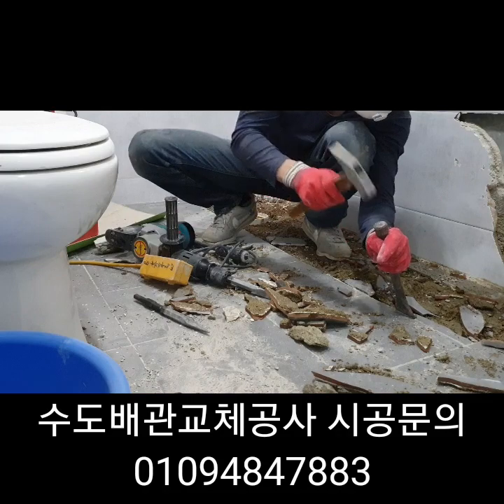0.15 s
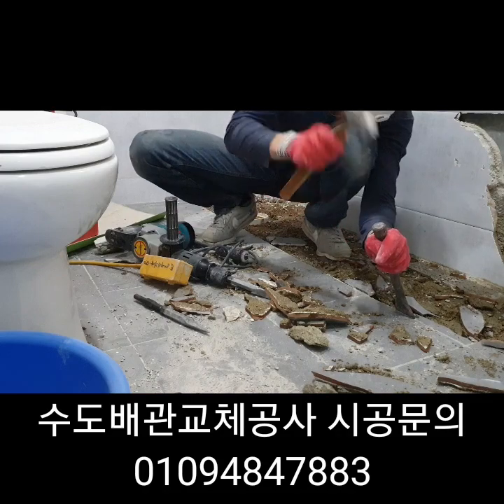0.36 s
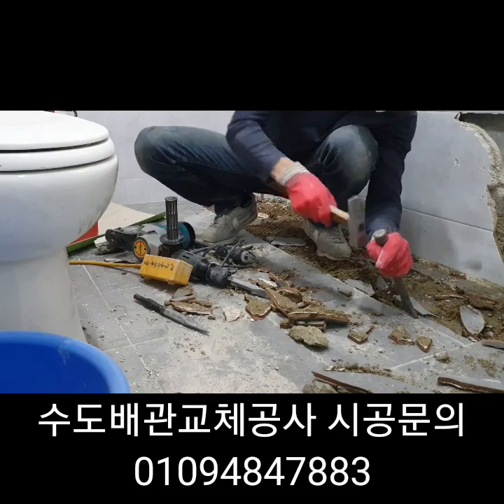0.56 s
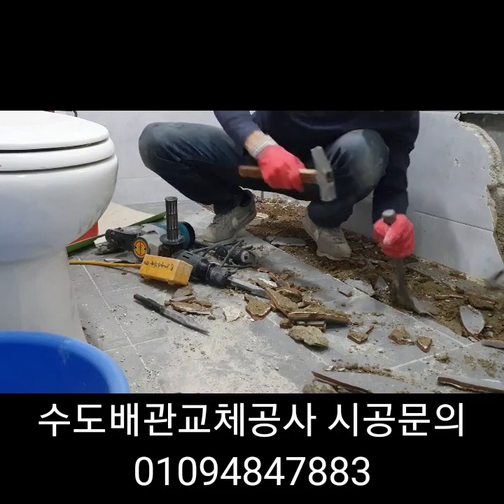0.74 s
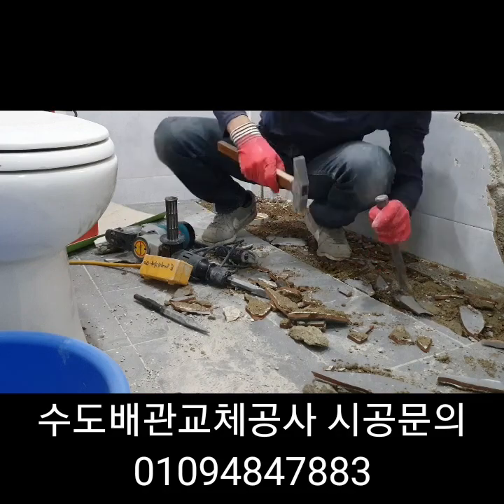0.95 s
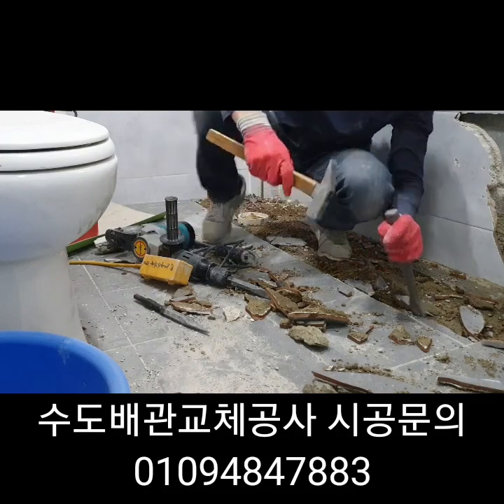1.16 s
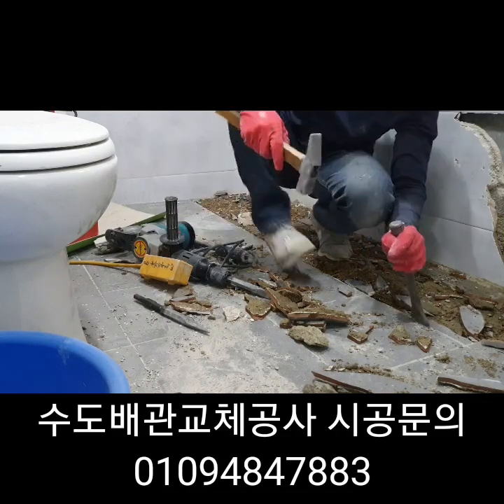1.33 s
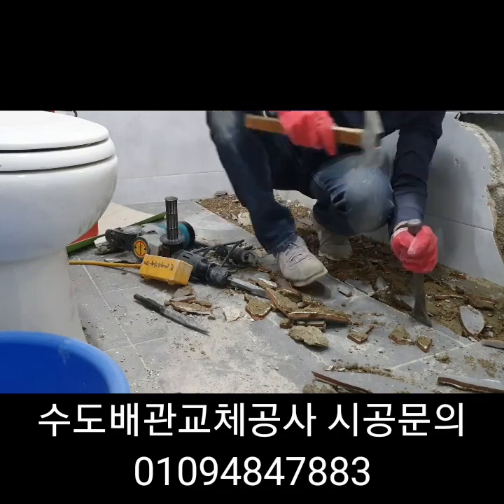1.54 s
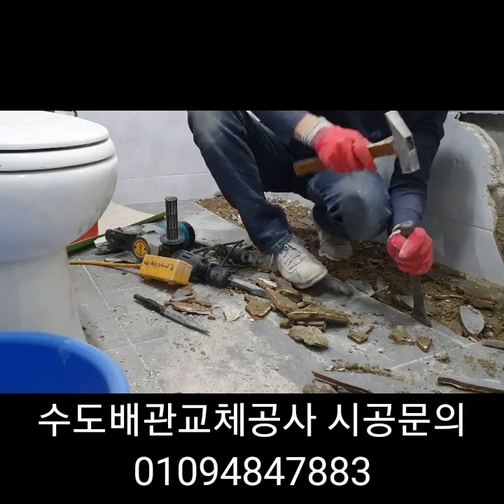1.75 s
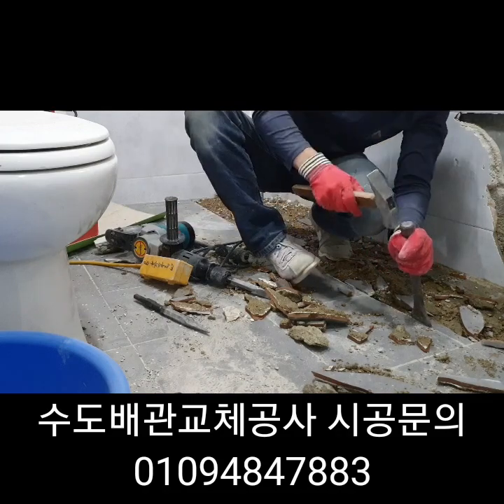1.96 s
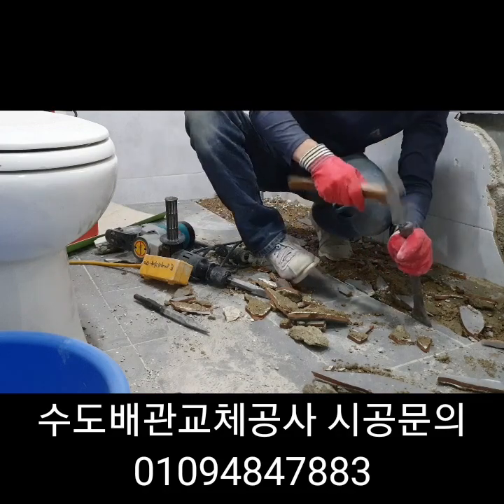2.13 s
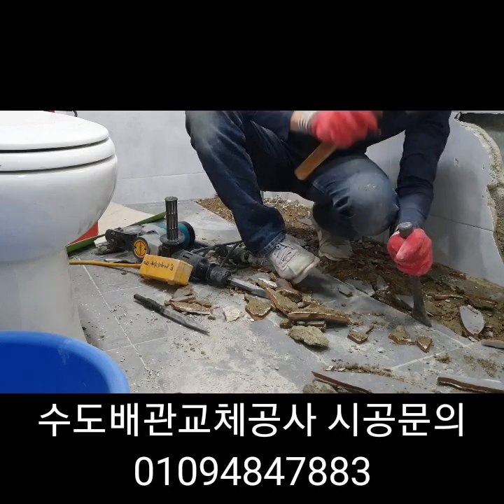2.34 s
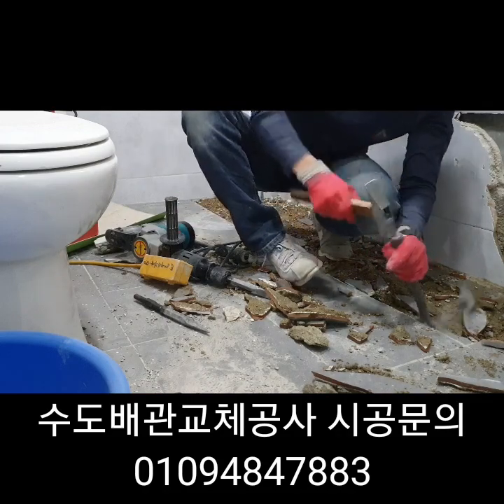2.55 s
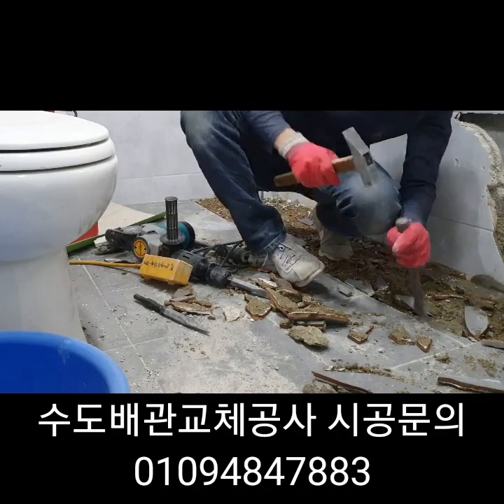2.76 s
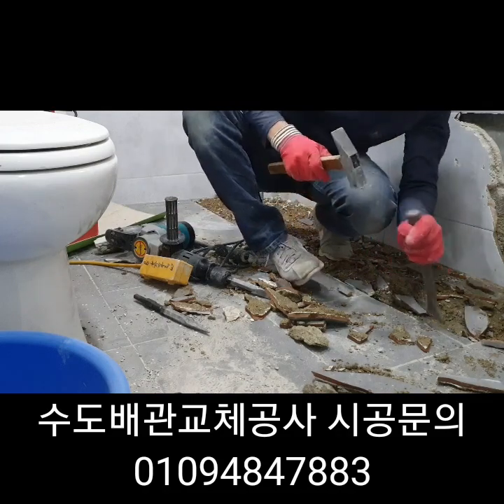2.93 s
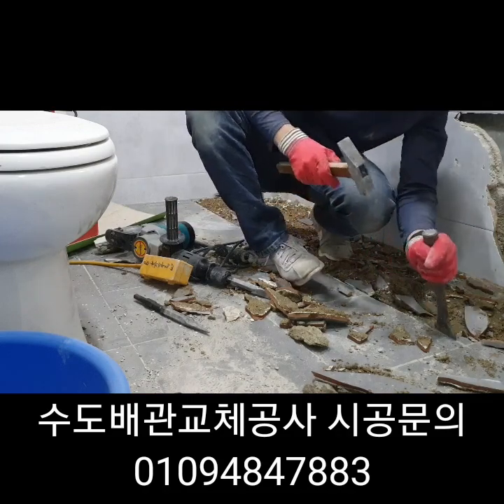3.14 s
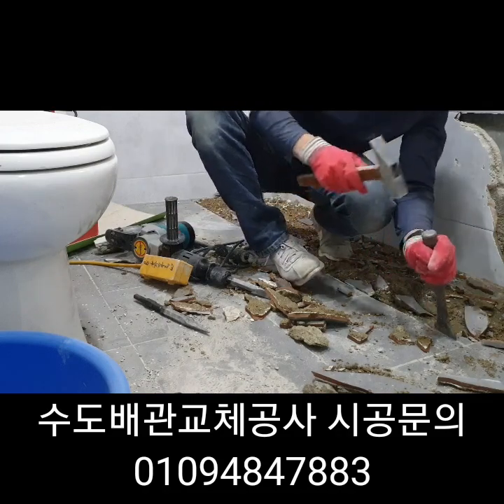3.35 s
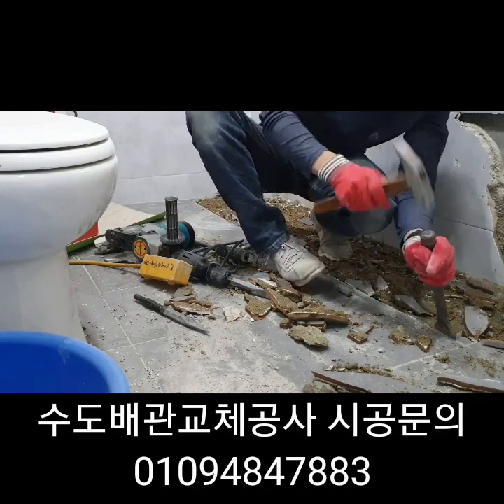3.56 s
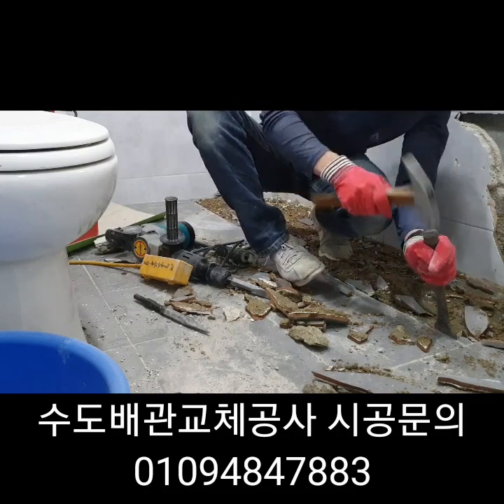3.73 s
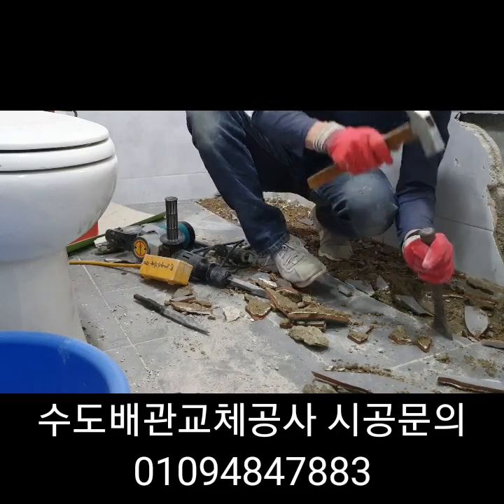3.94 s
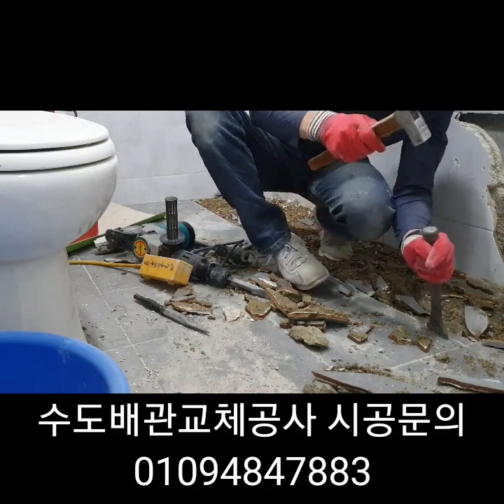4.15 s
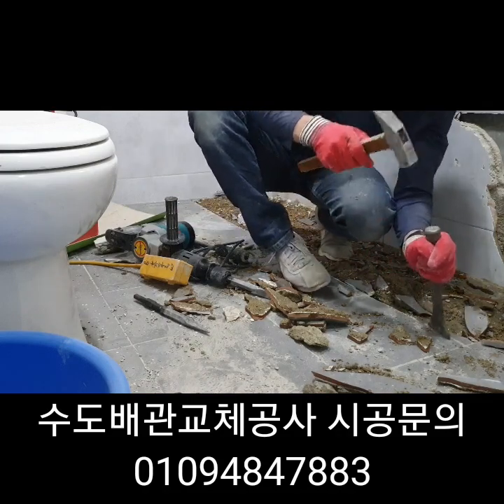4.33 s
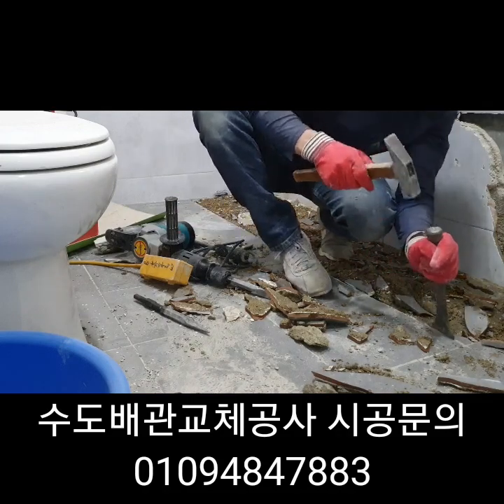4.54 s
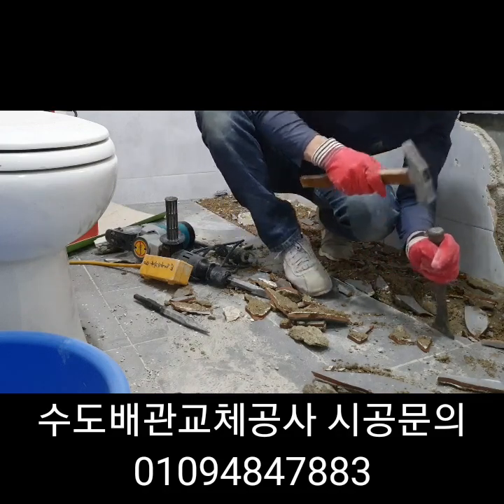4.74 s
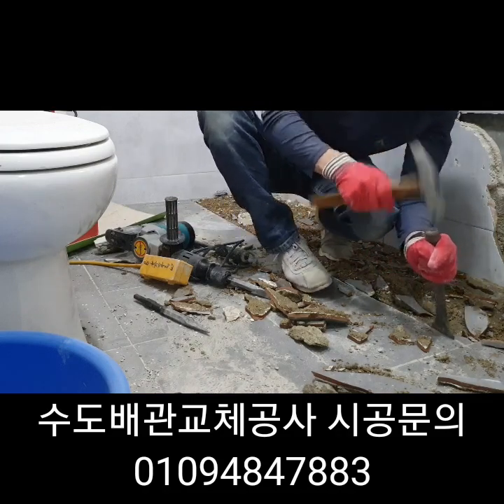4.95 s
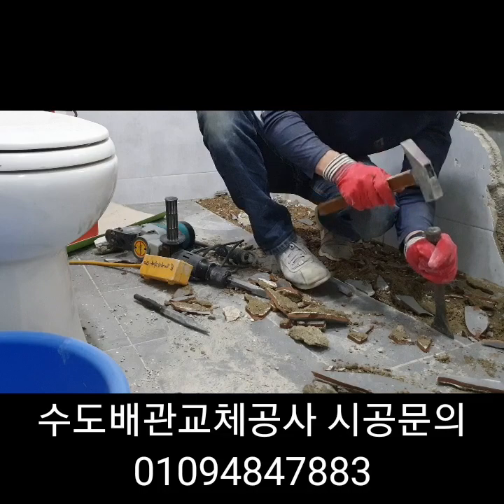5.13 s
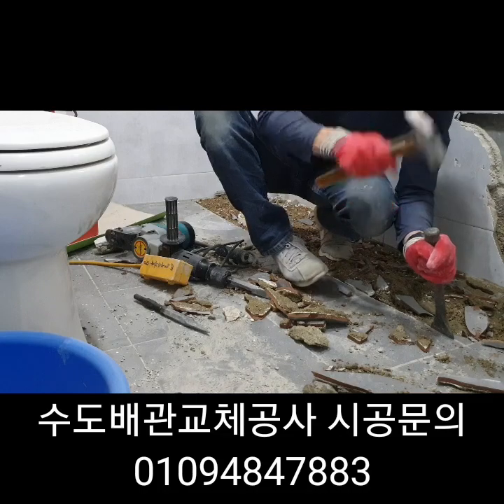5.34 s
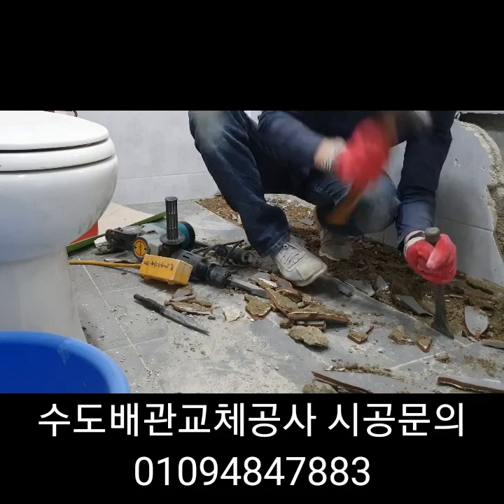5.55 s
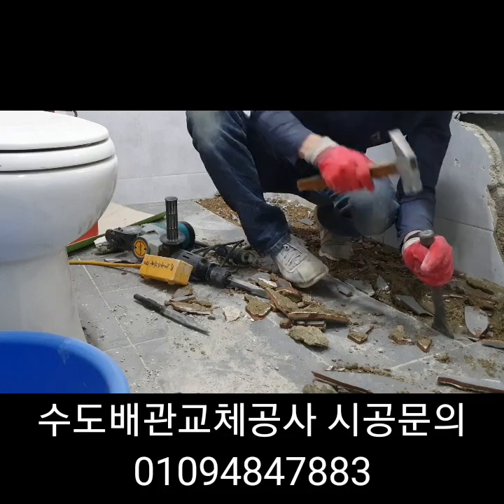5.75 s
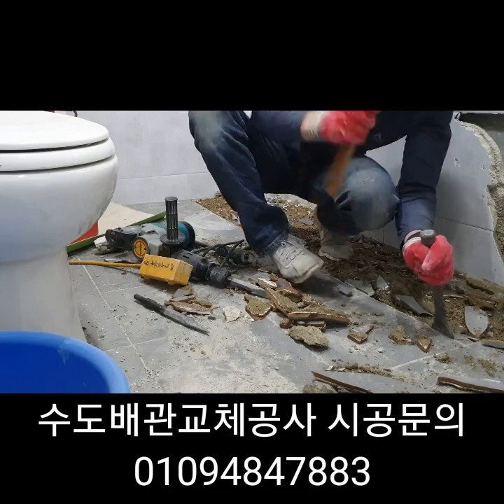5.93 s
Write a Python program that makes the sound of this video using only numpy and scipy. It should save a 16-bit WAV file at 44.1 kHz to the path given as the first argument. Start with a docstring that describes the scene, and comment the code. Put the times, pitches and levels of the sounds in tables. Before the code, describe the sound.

Someone chips mortar with hammer and chisel: sharp ringing hits in irregular groups, debris clacking and grit scraping between them, short hard-room echo.

```python
"""In a small tiled bathroom, hammer blows drive a steel chisel into the mortar bed at uneven intervals.
Each blow is a snap and a run of fractures: it excites coloured mortar noise and decaying modes of steel,
tile and floor. Light touches ring the steel, chips clack, a shard clinks, and grit scrapes as random snaps.
Band-wise decaying noise gives the echoes; low rumbles, air noise and a faint hum lie beneath."""
import sys
import numpy as np
from scipy import signal
from scipy.fft import rfft, irfft, next_fast_len
from scipy.io import wavfile

SR = 44100
rng = np.random.default_rng(int(sys.argv[2]) if len(sys.argv) > 2 else 0)


def unload_audio(sound):
    """Save the sound as a 16-bit wav file, at the path given as the first command line argument."""
    columns = np.transpose(np.atleast_2d(sound))
    # keep every value between -1 and 1, then stretch to whole-number steps
    steps = np.round(np.clip(columns, -1, 1) * 32767)
    wavfile.write(sys.argv[1], SR, steps.astype(np.int16))


N = 264159
SPAN = 2 ** 15   # samples that one event lasts
AGE = np.arange(SPAN) / SR   # s since the event began

# steady air noise, spectral shape: frequency_hz, level_db_per_hz
AIR_SPECTRUM = [(20, 1.5), (45, -13), (65, 1.5), (110, -5.5), (200, -4.5), (370, 0), (700, -5.5),
                (1200, -15), (3000, -30), (8000, -35.5), (15000, -33)]
# faint machine hum: frequency_hz, rms_level_db
HUM_TONES = [(63, -80), (120, -74), (151, -73), (361, -70.5)]
AIR_DB = -61.5
# shoe and chisel tip dragging through rubble, one row a stroke: peak_s, rise_s, fall_s, coarse_db, fine_db
SCRAPE_STROKES = [(0.031, 0.075, 0.17, -48.5, -60), (0.289, .006, 0.21, -73, -63.5),
                  (.612, 0.018, .2, -52, -49), (1.25, 0.16, 0.16, -44.5, -54), (1.557, 0.011, .2, -46, -34),
                  (1.84, .02, 0.21, -63.5, -62.5), (2.048, 0.41, 0.3, -56.5, -53.5),
                  (4.31, 0.37, 0.5, -60.5, -60), (4.548, 0.0032, 0.14, -61.5, -44.5),
                  (4.725, .008, 0.12, -64.5, -66), (5.07, 0.38, 0.29, -65, -60.5)]
# coarse grit, spectral shape: frequency_hz, level_db_per_hz
COARSE_SPECTRUM = [(600, -6.5), (1500, -3), (3500, 2.5), (5500, -2.5), (8000, -13.5)]
# fine sand, spectral shape: frequency_hz, level_db_per_hz
FINE_SPECTRUM = [(3500, -13), (6000, -6), (7400, 2), (9000, -9), (11000, -1.5), (14500, -15), (16000, -37)]
SWELL_DB = 20   # climb of a stroke over its rise time, and drop over its fall time
# low swells as the worker winds up: peak_s, rise_s, fall_s, peak_level_db
RUMBLE_SWELLS = [(.63, 0.56, .05, -56), (2.06, 0.39, 1.1, -53.5)]
# rumble, spectral shape: frequency_hz, level_db_per_hz
RUMBLE_SPECTRUM = [(25, -7), (70, -2.5), (130, 1.5), (250, -9), (600, -28.5), (2000, -69)]

# hammer blows: start_s, crack_db, crush_s, bright_db, glance_db, ping_db, tink_db, thump_db
HAMMER_BLOWS = [(.356, -27, 0.013, -3, -0.5, -23, -26.5, -72), (.665, -25, .04, 2, 0.5, -16, -19.5, -46.5),
                (2.078, -22.5, .014, 4, -2.5, -19.5, -47, -60.5),
                (2.311, -29, 0.0055, -6, -7, -16, -28, -59), (2.657, -23.5, 0.041, -1, -5, -22, -16, -51),
                (3.744, -33, 0.0086, -3.5, 7.5, -34.5, -32.5, -67),
                (3.917, -31, 0.0064, 1.5, 20.5, -23.5, -33, -68),
                (5.1171, -23.5, 0.021, 2, 4, -19, -26.5, -59.5),
                (5.331, -25, 0.0083, 1.5, -5, -24, -33.5, -65),
                (5.7304, -23, 0.027, 1.5, -6.5, -18.5, -28, -50)]
# names of the steel mode families, in the order of their levels in a blow: family
MODE_FAMILIES = ["hum", "clang", "clink", "ping", "tink"]
# steel modes; a family is struck together, and close pairs beat: frequency_hz, level_db, t60_s, family
STEEL_MODES = [(1386, 0, .22, "hum"), (4072, -3, .14, "hum"), (8490, -7, .12, "hum"),
               (13325, -6, .13, "hum"), (3563, 0, .13, "clang"), (3585, -6, .1, "clang"),
               (3892, -14, .15, "clang"), (11868, -14, .22, "clang"), (6389, 0, .11, "clink"),
               (6480, -5, .09, "clink"), (12228, -19, .12, "clink"), (14190, -19, .11, "clink"),
               (7670, 0, .1, "ping"), (7612, -7, .06, "ping"), (13400, -23, .06, "ping"),
               (14310, -23, .06, "ping"), (15250, -19, .04, "ping"), (9884, 0, .06, "tink"),
               (10036, -5, .06, "tink"), (9760, -7, .04, "tink"), (12240, -20, .04, "tink")]
# bending of the shank wakes hum, clang and clink, one row each: level_over_crack_db, db_per_glance_db
BENDING_LEVELS = [(-24, .9), (-16.5, 1.3), (-6.5, .75)]
# breaking mortar and tile, spectral shape: frequency_hz, level_db_per_hz
CRACK_SPECTRUM = [(60, -42.5), (170, -18), (290, -17), (500, -10), (1000, -7), (1700, 4), (2400, 6.5),
                  (3100, 4), (4400, 9), (5400, 3), (7200, 5.5), (8600, 2.5), (11000, -0.5), (15000, -23)]
# tile under the tip, heavily damped by its bed: frequency_hz, level_db, t60_s
TILE_MODES = [(1690, -5, .02), (2380, -2, .025), (2560, 0, .025), (3930, -2, .02), (4470, 0, .02),
              (7250, -1, .02)]
# floor slab under the chisel: frequency_hz, level_db, t60_s
SLAB_MODES = [(276.3, 3, 0.81), (379, 0, 0.77), (455, -6, 1)]
# deep floor modes, shaken by hard blows: frequency_hz, level_db, t60_s
THUMP_MODES = [(46, -8, .15), (74, 0, .18), (112, 0, .18), (158, -1, .16)]
SMALL_BODY_HZ = 330   # steel and tile radiate little below this

# hammer and chisel meeting lightly between blows: start_s, tick_db, ring_db, hum_db
LIGHT_TOUCHES = [(.888, -54, -42, -49.5), (1.417, -62.5, -58.5, -60), (3.239, -56, -56, -49.5),
                 (4.575, -60, -59, -57), (4.965, -68.5, -64.5, -70)]
# clang, clink, ping and tink of a touch, one entry each: level_over_ring_db
TOUCH_FAMILY_DB = [-6, -2, -15, -11]
TOUCH_CRUSH_S, TOUCH_BRIGHT_DB = .003, -10.5

# loose pieces landing or shifting: start_s, clack_db, pitch_hz, grit_db, rattle_s
CHIP_LANDINGS = [(.921, -44.5, 1100, -70, 0.012), (.93, -43.5, 708, -51.5, 0.075),
                 (.985, -49, 680, -53, 0.016), (1.551, -52, 467, -51.5, 0.045),
                 (2.875, -46.5, 722, -45, 0.042), (2.93, -58, 610, -62, 0.027),
                 (3.085, -47.5, 866, -48.5, 0.015), (4.547, -44.5, 1165, -53, 0.003)]
# hollow clack, spectral shape: multiple_of_pitch, level_db_per_hz
CLACK_SPECTRUM = [(0.299, -8.5), (0.599, 0.5), (1, 8.5), (1.5, 1.5), (3.002, -20.5), (6, -68.5)]
# spray of grit, spectral shape: frequency_hz, level_db_per_hz
CHIP_GRIT_SPECTRUM = [(600, -7), (2300, 15.5), (4500, 6.5), (7500, -2.5), (11000, -4.5), (15000, -7.5)]
# landing of a loose shard, a single row: start_s, level_db
SHARD_LANDING = (2.839, -42)
# modes of the shard: frequency_hz, level_db, t60_s
SHARD_MODES = [(5350, -4, .04), (4780, 0, .015), (4450, -3, .015)]

# decay of the bathroom's echoes: frequency_hz, t60_s
BATHROOM_T60 = [(100, 0.2), (300, 0.67), (1400, 0.55), (2500, 0.55), (4500, .49), (8000, 0.38),
                (14000, 0.24)]
# left-right correlation of noise and echoes, negative when out of step: frequency_hz, correlation
STEREO_LIKENESS = [(60, .4), (300, .6), (600, .3), (1200, -.15), (2500, -.2), (5000, 0), (15000, 0)]
DIRECT_DB, EARLY_DB = -12.5, 0   # levels against the tail
LEFT_LAG_S, BUILD_S = .00046, .0011   # delay of the direct sound on the left; build-up of the echoes
CUTOFF_HZ = 15500


def from_db(db):
    """Level law: an amplitude ratio is ten to the power of dB over twenty."""
    return 10 ** (np.asarray(db) / 20)


def rms_one(x):
    """Normalisation: division by the root mean square gives unit power."""
    return x / np.sqrt(np.mean(x ** 2) + 1e-20)


def at_level(x, level_db):
    """Short-time level: the mean power of the first 120 ms sets the level of the sound."""
    first = x[:, :int(.12 * SR)]
    return from_db(level_db) * x / np.sqrt(np.mean(first ** 2) + 1e-20)


def add(out, start_s, sound):
    """Superposition: sound pressures add linearly."""
    i = round(start_s * SR)
    out[:, i:i + SPAN] += sound[:, :N - i]


def at_hz(points, hz):
    """Interpolation: a table is read along a logarithmic frequency axis."""
    f, value = np.transpose(points)
    return np.interp(np.log(np.maximum(hz, 1)), np.log(f), value)


def coloured(x, spectrum):
    """Minimum phase: a folded cepstrum turns a magnitude spectrum into a causal filter."""
    n = x.shape[-1]
    size = next_fast_len(n // 2 + 1) * 2
    hz = np.arange(size // 2 + 1) * SR / size
    cepstrum = irfft(np.log(from_db(at_hz(spectrum, hz))), size)
    cepstrum[1:] *= 2
    response = np.exp(rfft(cepstrum[:size // 2], size))
    return rms_one(irfft(rfft(x, size) * response, size)[..., :n])


def stereo_noise(size):
    """Interaural coherence: mid and side noise are weighted to set the correlation by frequency."""
    n = next_fast_len(size)
    mid, side = rfft(rng.standard_normal((2, n)))
    alike = np.clip(at_hz(STEREO_LIKENESS, np.arange(len(mid)) * SR / n), -.95, .95)
    both = np.sqrt(1 + alike) * mid
    opposed = np.sqrt(1 - alike) * side * [[1], [-1]]
    return irfft(both + opposed, n)[:, :size]


def decay(t60_s):
    """Exponential decay: amplitude falls a thousandfold, 60 dB, in t60."""
    return np.exp(-np.log(1000) * AGE / t60_s)


def room_tone():
    """Broadband and tonal background: steady coloured noise adds to a few pure tones."""
    t = np.arange(N) / SR
    hum = sum(np.sqrt(2) * from_db(db) * np.sin(2 * np.pi * (hz * t + rng.random()))
              for hz, db in HUM_TONES)
    return from_db(AIR_DB) * coloured(stereo_noise(N), AIR_SPECTRUM) + hum


def swell(peak_s, rise_s, fall_s):
    """Exponential envelope: the gain climbs to its peak and sinks again, evenly in dB."""
    t = np.arange(N) / SR - peak_s
    return from_db(-SWELL_DB * np.maximum(-t / rise_s, t / fall_s))


def rumble():
    """Amplitude modulation: slow gains shape low noise into soft swells."""
    gain = sum(from_db(db) * swell(peak_s, rise_s, fall_s) for peak_s, rise_s, fall_s, db in RUMBLE_SWELLS)
    return coloured(stereo_noise(N), RUMBLE_SPECTRUM) * gain


def grains(size, per_s, spread_db):
    """Random point process: independent snaps of uneven strength and either sign."""
    excess = np.minimum(rng.exponential(1, size), 4)
    strength = from_db(spread_db * excess) * rng.choice([-1, 1], size)
    return strength * (rng.random(size) < per_s / SR)


def bathroom(force, early_s=0.013):
    """Statistical reverberation: direct sound, early slaps off near tiles, and a tail decaying by band.

    Each snap has its own spot, so the echoes of a run add in power.
    """
    def fading(t60_s):
        """Energy balance: a leaky sum of squared force gives the echo amplitude."""
        keep = np.exp(-2 * np.log(1000) / (t60_s * SR))
        return np.sqrt(signal.lfilter([1], [1, -keep], force ** 2 + 1e-18))

    noise = rfft(stereo_noise(SPAN))
    hz = np.arange(SPAN // 2 + 1) * SR / SPAN
    centres, t60s = np.transpose(BATHROOM_T60)
    # overlapping bands, each full at its own centre and zero at the others
    tail = sum(irfft(noise * at_hz(np.c_[centres, share], hz)) * fading(t60_s)
               for share, t60_s in zip(np.eye(len(centres)), t60s))
    slaps = stereo_noise(SPAN) * fading(early_s * np.log(1000))   # early_s is the time constant
    build = 1 - np.exp(-AGE / BUILD_S)
    # the right side hears the work first
    direct = np.array([np.pad(force, (int(LEFT_LAG_S * SR), 0))[:SPAN], force])
    return (rms_one(tail * build) + from_db(EARLY_DB) * rms_one(slaps * build)
            + from_db(DIRECT_DB) * rms_one(direct))


def scraping():
    """Stick-slip friction: grains snap under sole and steel, and the room blurs them."""
    def grit(spectrum):
        """Convolution: coloured snaps pass through the room's impulse response."""
        snaps = coloured(grains(N + SPAN, per_s=500, spread_db=5.0), spectrum)
        room = bathroom(signal.unit_impulse(SPAN))
        return rms_one(signal.fftconvolve(snaps[None], room)[:, SPAN:SPAN + N])

    coarse, fine = grit(COARSE_SPECTRUM), grit(FINE_SPECTRUM)
    return sum(swell(peak_s, rise_s, fall_s) * (from_db(coarse_db) * coarse + from_db(fine_db) * fine)
               for peak_s, rise_s, fall_s, coarse_db, fine_db in SCRAPE_STROKES)


def ringing(modes, detune):
    """Modal superposition: decaying sines, each shifted slightly in pitch at every strike."""
    return sum(from_db(db) * decay(t60_s) * np.sin(2 * np.pi * hz * (1 + detune * rng.normal()) * AGE)
               for hz, db, t60_s in modes)


def heard(x, room, level_db):
    """Radiation of a small body: weak in the bass, and driven by the snaps and their echoes."""
    high_pass = signal.butter(2, SMALL_BODY_HZ, "high", fs=SR, output="sos")
    x = signal.sosfilt(high_pass, x)
    return at_level(signal.fftconvolve(x[None], room)[:, :SPAN], level_db)


def floor_ring(modes, side_db=-4):
    """Long waves: both sides move alike, except for a part that swings out of step."""
    mid = ringing(modes, detune=.01)
    side = sum(from_db(db) * decay(t60_s) * rng.choice([-1, 1])
               * np.sin(2 * np.pi * hz * rng.uniform(.9, 1.1) * AGE)
               for hz, db, t60_s in modes)
    return mid + from_db(side_db) * side * [[1], [-1]]


def crumble(crush_s, run_db):
    """Brittle fracture: one snap, then a run of small fractures whose energy grows with crushing time."""
    run = grains(SPAN, per_s=1500, spread_db=4)
    run = run * np.exp(-(AGE / crush_s) ** 2)
    # run_db is the level against the snap for a 15 ms crush
    strength = from_db(run_db) * np.sqrt(crush_s / .015)
    force = strength * run / (np.linalg.norm(run) + 1e-12)
    force[0] += 1
    return force


def blow(crack_db, crush_s, bright_db, ring_dbs, thump_db,
         crush_db=3, slab_db=-23, tile_db=-6, thump_rise_s=0.0079):
    """Impact excitation: mortar cracks, steel and tile are jolted by the same fractures, the floor answers."""
    room = bathroom(crumble(crush_s, crush_db))
    # brightness sets in above 5500 Hz and is full an octave higher
    spectrum = [(hz, db + bright_db * np.clip(np.log2(hz / 5500), 0, 1)) for hz, db in CRACK_SPECTRUM]
    out = at_level(coloured(room, spectrum), crack_db)
    out += heard(ringing(TILE_MODES, detune=.018), room, crack_db + tile_db)
    for family, ring_db in zip(MODE_FAMILIES, ring_dbs):
        modes = [(hz, db, t60_s) for hz, db, t60_s, kind in STEEL_MODES if kind == family]
        out += heard(ringing(modes, detune=.0006), room, ring_db)
    slab = at_level(floor_ring(SLAB_MODES), crack_db + slab_db)
    thump = floor_ring(THUMP_MODES) * (1 - np.exp(-AGE / thump_rise_s))
    return out + slab + at_level(thump, thump_db)


def hammering():
    """Bending waves: the more a blow glances off the chisel, the more the shank rings."""
    out = np.zeros((2, N))
    for start_s, crack_db, crush_s, bright_db, glance_db, ping_db, tink_db, thump_db in HAMMER_BLOWS:
        bending_dbs = [crack_db + db + follows * glance_db for db, follows in BENDING_LEVELS]
        ring_dbs = bending_dbs + [ping_db, tink_db]
        add(out, start_s, blow(crack_db, crush_s, bright_db, ring_dbs, thump_db))
    return out


def touching():
    """Light impact: a tick and a ring, with little crushed and no floor thump."""
    out = np.zeros((2, N))
    for start_s, tick_db, ring_db, hum_db in LIGHT_TOUCHES:
        ring_dbs = [hum_db] + [ring_db + db for db in TOUCH_FAMILY_DB]
        add(out, start_s, blow(tick_db, TOUCH_CRUSH_S, TOUCH_BRIGHT_DB, ring_dbs, thump_db=-np.inf))
    return out


def chips(rattle_db=4):
    """Repeated impact: pieces of mortar rattle with a hollow, pitched clack and a spray of grit."""
    out = np.zeros((2, N))
    for start_s, clack_db, pitch_hz, grit_db, rattle_s in CHIP_LANDINGS:
        room = bathroom(crumble(rattle_s, rattle_db))
        clack = coloured(room, [(k * pitch_hz, db) for k, db in CLACK_SPECTRUM])
        grit = coloured(room, CHIP_GRIT_SPECTRUM)
        add(out, start_s, at_level(clack, clack_db) + at_level(grit, grit_db))
    return out


def shard():
    """Free vibration: a flake of tile lands on its edge and its short modes clink in the room."""
    out = np.zeros((2, N))
    start_s, level_db = SHARD_LANDING
    room = bathroom(signal.unit_impulse(SPAN))
    add(out, start_s, heard(ringing(SHARD_MODES, detune=.001), room, level_db))
    return out


def scene():
    """Superposition of sources: the work, the low swells and the background add."""
    work = scraping() + hammering() + touching() + chips() + shard()
    return room_tone() + rumble() + work


def record(dry):
    """Saturation and band limiting: the highest peaks are rounded and the top is cut."""
    rounded = dry / (1 + dry ** 6) ** (1 / 6)
    low_pass = signal.ellip(10, .2, 80, CUTOFF_HZ, fs=SR, output="sos")
    return signal.sosfilt(low_pass, rounded)


dry = scene()
out = record(dry)
unload_audio(out)
```